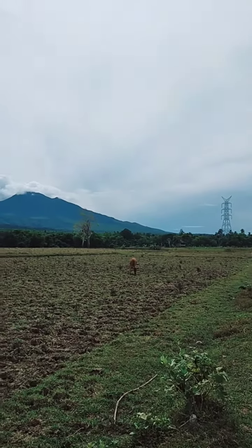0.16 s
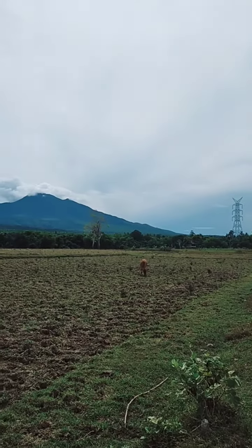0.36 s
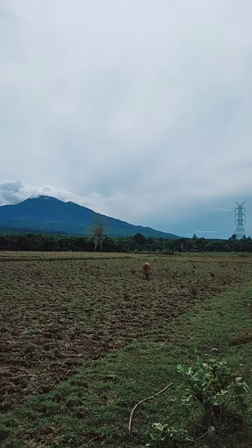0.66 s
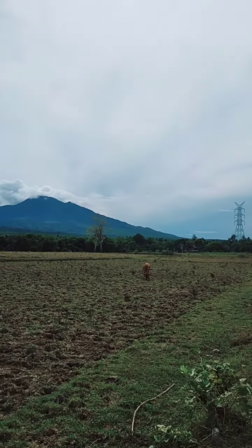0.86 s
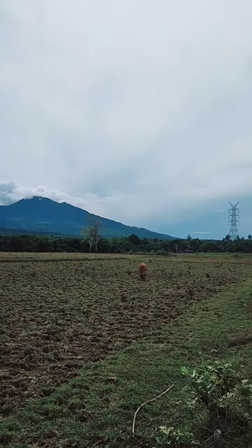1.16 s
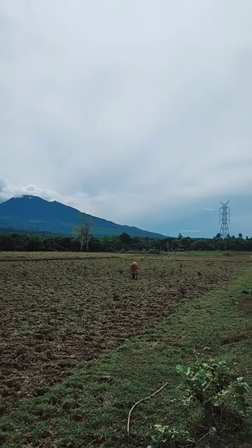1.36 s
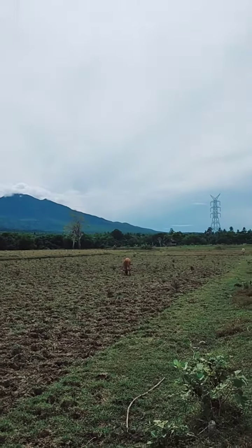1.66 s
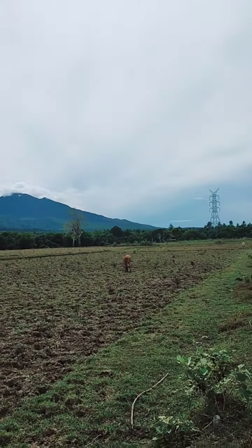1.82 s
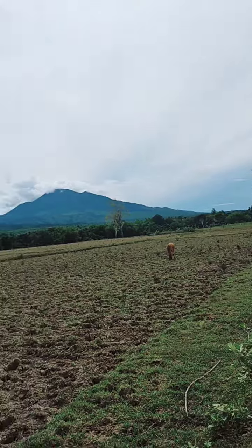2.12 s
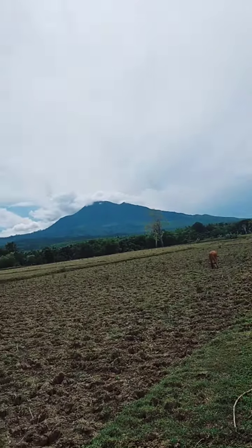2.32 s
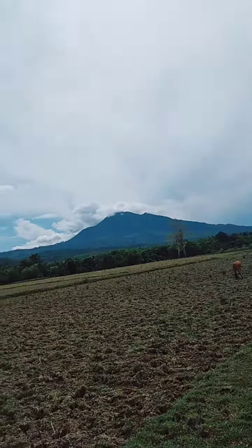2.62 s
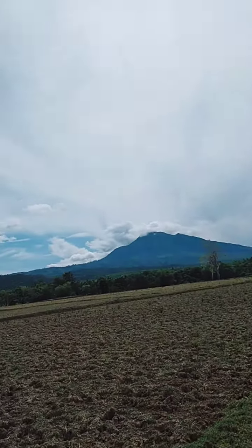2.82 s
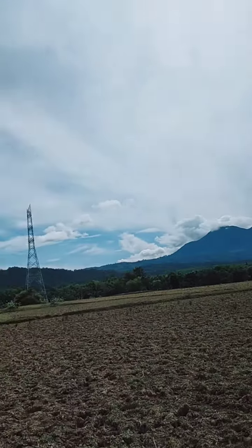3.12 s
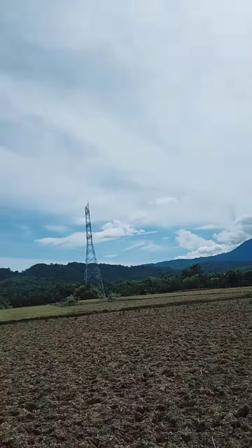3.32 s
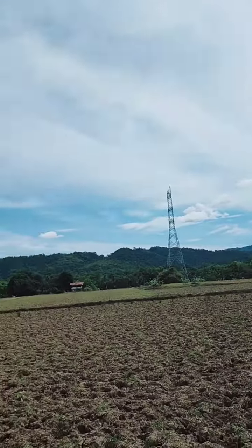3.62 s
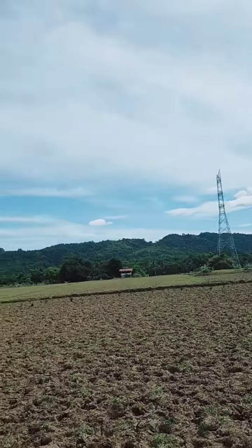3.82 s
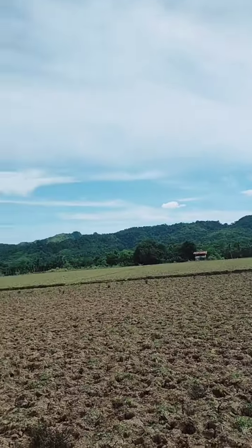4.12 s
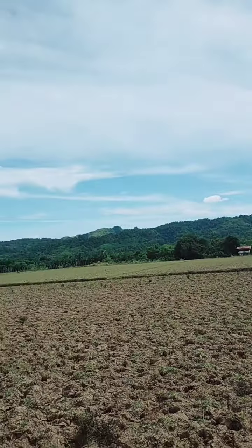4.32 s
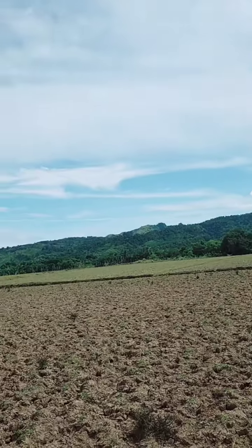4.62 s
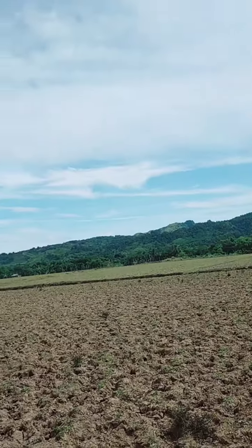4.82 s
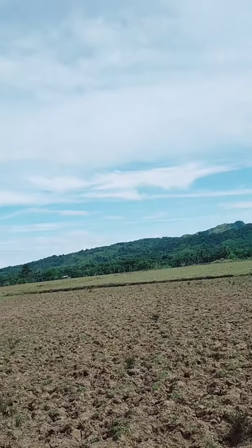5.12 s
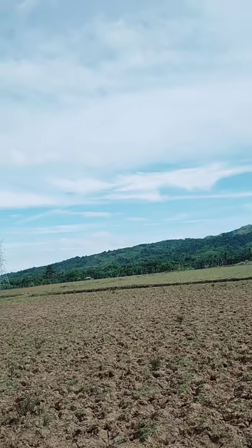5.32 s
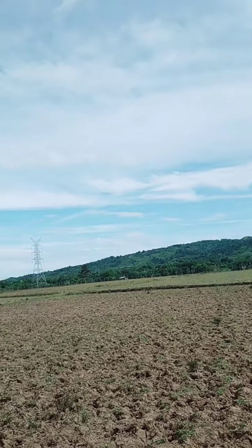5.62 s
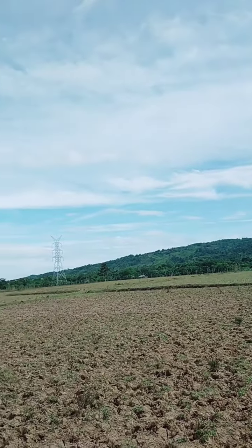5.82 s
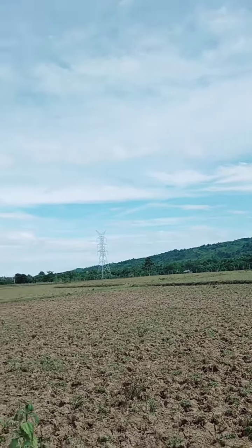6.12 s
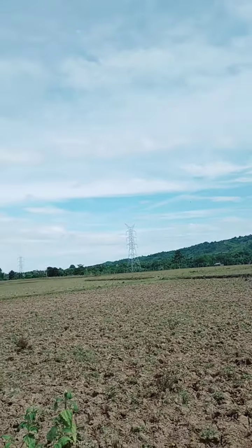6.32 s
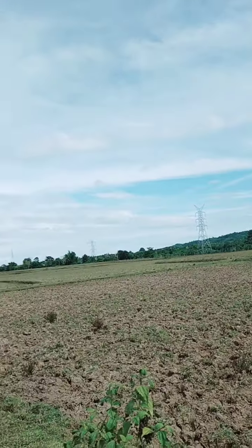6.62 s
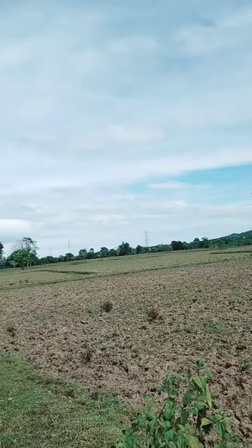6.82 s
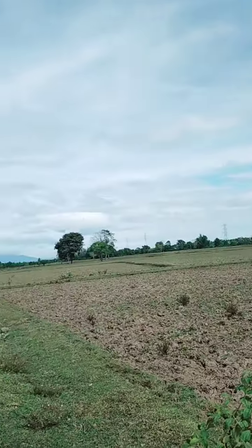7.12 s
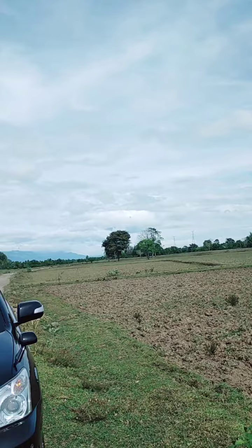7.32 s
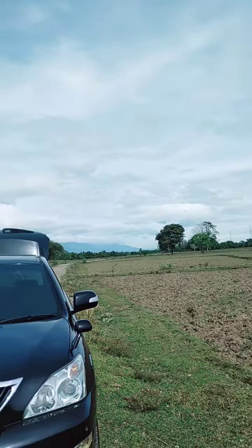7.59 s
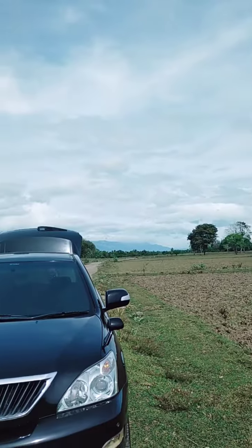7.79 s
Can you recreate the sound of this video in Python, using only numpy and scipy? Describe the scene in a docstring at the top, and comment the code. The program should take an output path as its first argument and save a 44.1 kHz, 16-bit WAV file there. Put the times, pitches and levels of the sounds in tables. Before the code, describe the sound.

In an open field, a single-cylinder engine idles nearby with slow, separate low thumps and a patchy high hiss. It throttles up, shudders with metallic clinks and rattling, then settles into a fast pulsing drone that passes and slowly recedes. Wind thumps the microphone, dry stubble snaps, and faint knocks and a thin bird whistle come near the end.

```python
"""In an open field a single-cylinder engine idles close by, is throttled up, shudders as it sets off and drives slowly away.
Each firing puffs gas and rings the exhaust, with noise for gas rasp, gears and frame, and a metallic tick.
Loose parts ring as they rattle over a high hiss. Throttle, shudder, direction and distance set the engine's levels.
Wind buffets the microphone with shaped noise, dry stubble snaps, dry knocks clatter and a bird whistles faintly."""
import sys
import numpy as np
from scipy import signal
from scipy.fft import rfft, irfft, next_fast_len
from scipy.io import wavfile
from scipy.ndimage import uniform_filter1d

SR = 44100
rng = np.random.default_rng(int(sys.argv[2]) if len(sys.argv) > 2 else 0)


def pcm_store(signal):
    """Save signal as 16-bit PCM."""
    levels = np.round(np.clip(np.atleast_2d(signal), -1, 1) * 32767)
    wavfile.write(sys.argv[1], SR, levels.astype(np.int16).T)


N = 350683
TIME = np.arange(N) / SR


def from_db(db):
    """Turn decibels into an amplitude factor."""
    return 10 ** (np.asarray(db) / 20)


def rms_one(x):
    """Scale a signal to an average strength (rms) of 1."""
    return x / np.sqrt(np.mean(x ** 2) + 1e-20)


def in_time(rows):
    """Join each column of a time table by straight lines."""
    s, *columns = np.transpose(rows)
    return [np.interp(TIME, s, column) for column in columns]


def butter(x, hz, kind, order=2):
    """Low-pass or high-pass filter that never looks ahead."""
    return signal.sosfilt(signal.butter(order, hz, kind, fs=SR, output="sos"), x)


def coloured(x, spectrum):
    """Weight a signal's frequencies by a spectrum table; rms 1."""
    hz, db = np.transpose(spectrum)
    size = next_fast_len(N + SR // 10)
    bins = np.maximum(np.fft.rfftfreq(size, 1 / SR), 1)
    gain = from_db(np.interp(np.log(bins), np.log(hz), db, left=-60, right=-90))
    return rms_one(irfft(rfft(x, size) * gain, size)[:N])


def white():
    """Noise with all frequencies equally strong."""
    return rng.standard_normal(N)


def drift(rate):
    """Random wandering with `rate` turning points per second and a spread of 1."""
    knots = rng.standard_normal(4000)
    return rms_one(np.interp(TIME * rate, np.arange(len(knots)), knots))


def die_away(clicks, decay_s):
    """Each click starts an exponential decay of its own height."""
    return signal.lfilter([1], [1, -np.exp(-1 / (decay_s * SR))], clicks + 1e-18)


def bell(s, half_s):
    """A smooth rise and fall around one moment."""
    return np.exp(-np.minimum(((TIME - s) / half_s) ** 2, 40))


def firings(uneven_db):
    """One click per engine cycle, each a little different in strength."""
    # engine speed: t/s, firings per s
    speed = [(0.0, 14.37), (0.75, 12.58), (1.26, 13.06), (1.42, 18.87), (1.6, 21.88), (1.9, 22.77),
             (2.62, 23.0), (2.88, 24.28), (3.2, 23.78), (3.7, 23.86), (4.5, 24.32), (5.68, 24.34),
             (6.0, 25.22), (7.95, 25.03)]
    cycles = np.cumsum(in_time(speed)[0]) / SR
    at = np.flatnonzero(np.diff(np.floor(cycles)))
    clicks = np.zeros(N)
    clicks[at] = from_db(uneven_db * rng.standard_normal(len(at)))
    return clicks


def part_levels():
    """Level in dB of each engine part over time, from throttle, shudder, direction and distance."""
    # throttle opening: t/s, share 0-1
    opening = [(0.6, 0.0), (1.2, 0.43), (1.42, 0.75), (1.65, 0.63), (2.4, 0.99), (4.7, 0.96), (5.7, 1),
               (7.95, 0.94)]
    # engine parts: level/dB idling at the nearest point,
    # then change/dB by full throttle, by the shudder, by facing, by turning away,
    # and loss/dB per doubling of distance
    part_db = { "boom": (-8, 15, 2.5, -2, -0.5, 7), "puff": (-35.5, 19.5, 3, -1, -0.5, 3.5),
               "rasp": (-51, 12, 8, -1.5, -4, 8.5), "gears": (-51, 0.4, 6.5, 1.5, -13, 6),
               "hiss": (-38, -2, 10, 5.5, -4, 7), "frame": (-70, 6, 16, -5, -13.5, 5.5),
               "tick": (-61, 10.5, -11, 15, -3.5, 6.5), }
    # the engine waits short of the microphone, then passes it in a straight line
    sets_off_s, short_of_m, passes_at_m, drive_m_per_s = 1.573, 1.95, 2.2, 2.74
    # the frame shudders while the drive takes up the load
    start_s, attack_s, hold_s, release_s = 0.98, 0.61, 0.29, 0.41
    throttle = np.clip(in_time(opening)[0], 0, 1)
    along_m = drive_m_per_s * np.maximum(TIME - sets_off_s, 0) - short_of_m
    doublings = np.log2(np.hypot(along_m, passes_at_m) / passes_at_m)
    shudder = np.interp(TIME, np.cumsum([start_s, attack_s, hold_s, release_s]), [0, 1, 1, 0])
    # after the pass, the engine's open side faces the microphone for a moment
    facing = np.exp(-((TIME - 3.535) / 0.32) ** 2)
    # the microphone turns away and every part becomes weaker
    away = (1 + np.tanh((TIME - 3.58) / 0.33)) / 2
    levels = {}
    for part, (idle_db, throttle_db, shudder_db, facing_db, away_db, loss_db) in part_db.items():
        level = idle_db + throttle_db * throttle + shudder_db * shudder
        levels[part] = level + facing_db * facing + away_db * away - loss_db * doublings
    return levels


def exhaust(fired, level_db, puff_s, lag_s, scatter_db):
    """Each firing sends out a rounded puff; the suction behind it rings the pipe's resonances."""
    # resonances (two of boom, one of bark, two middle, three of edge):
    # f/Hz before tuning, width/Hz, relative level/dB, swell/s
    pipe = [(124.7, 58.7, -12.5, 0.0026), (161.4, 32.6, -17, 0.0087), (273.3, 65.4, -21, 0.0014),
            (387.7, 79, -28, 0.0022), (513.7, 74, -26.5, 0.0029), (615.5, 50, -37, 0.0012),
            (713.6, 45.3, -38.5, 0.0026), (855, 55, -44.5, 0.0031)]
    # tone above the boom: t/s, pitch factor of the bark, pitch factor of middle and edge,
    # change/dB of bark, of middle, of edge
    pipe_tone = [(1.1, 0.77, 0.78, 1, 2, 1), (1.55, 0.88, 0.79, 4.5, 8, -1.5),
                 (2.0, 0.86, 1.04, -2.5, -1.5, -3.5), (2.45, 0.87, 0.9, -0.5, -4, 2.5),
                 (2.9, 0.91, 1.035, -2.5, -1, 1.5), (3.65, 0.96, 0.97, 1.5, 6.5, 4),
                 (4.2, 0.98, 0.95, 3, 8, 7), (5.05, 0.93, 0.95, 4, 0.5, -3),
                 (5.7, 1.0, 0.96, 10.5, 2, -1.5), (6.6, 1, 0.93, 6, 2.5, -12.5),
                 (7.95, 0.96, 1.06, 5.5, 4, -1.5)]
    puff_lead_s = 0.00032  # the puff peaks just before the pipe starts to ring
    age = np.arange(-SR // 200, SR // 12) / SR
    since = np.maximum(age, 0)
    hz, width, db, swell = np.transpose(pipe)[:, :, None]
    mode = np.arange(len(pipe))[:, None]
    # the slow second boom swings the opposite way
    swing = np.where(mode == 1, 1, -1)
    rings = swing * from_db(db) * np.exp(-np.pi * width * since) * (1 - np.exp(-since / swell))
    puff = np.exp(-np.minimum(((age + puff_lead_s) / puff_s) ** 2 / 2, 40))
    # the boom's pitch rises as the gas heats under load
    cold_tuning, hot_tuning, heating_from_s, heating_s = 0.85, 0.97, 1, 0.37
    still_cold = np.exp(-np.maximum(TIME - heating_from_s, 0) / heating_s)
    tuning = hot_tuning + (cold_tuning - hot_tuning) * still_cold
    bark_glide, glide, bark, middle, edge = in_time(pipe_tone)
    out = np.zeros(N + len(age))
    for i in np.flatnonzero(fired):
        tone_db = np.repeat([0, bark[i], middle[i], edge[i]], [2, 1, 2, 3])[:, None]
        # the higher resonances vary more from puff to puff
        chance_db = scatter_db * hz / hz.max() * rng.standard_normal(hz.shape)
        levels = level_db["boom"][i] + tone_db + chance_db
        pitches = hz * np.repeat([tuning[i], bark_glide[i], glide[i]], [2, 1, 5])[:, None]
        ringing = np.sum(from_db(levels) * rings * np.sin(2 * np.pi * pitches * since), axis=0)
        out[i:i + len(age)] += fired[i] * (from_db(level_db["puff"][i]) * puff + ringing)
    return np.interp(TIME - age[0] - lag_s, TIME, out[:N])


def ticks(fired, level_db, lag_s):
    """Combustion knock: a short burst of bright noise after each firing, uneven in strength."""
    # spectrum: f/Hz, level/dB per Hz
    tick_spectrum = [(3000, -51.5), (3800, -14.5), (4300, -16.5), (5100, -5), (5900, -8), (7500, 2.5),
                     (8700, -33.5)]
    knock = np.interp(TIME - lag_s, TIME, die_away(fired, 0.0015)) * from_db(1.6 * drift(25))
    softened = butter(knock, 250, "low", order=1)
    return from_db(level_db) * coloured(white() * softened, tick_spectrum)


def surging(fired, spectrum, throb, decay_s, rough_db):
    """Rough noise that surges just after each firing; rms 1."""
    stroke = (1 + throb * die_away(fired, decay_s)) * from_db(rough_db * drift(180))
    return coloured(white() * stroke, spectrum)


def gas_rasp(fired, level_db):
    """Gas noise surges with each firing, with extra level in a few spluttering strokes."""
    # spectrum: f/Hz, level/dB per Hz
    rasp_spectrum = [(200, -1.5), (400, 4), (570, 3), (720, 1.5), (950, -3.5), (1280, -7.5), (1700, -20.5),
                     (2500, -24.5)]
    # spluttering strokes: t/s, half length/s, added level/dB
    splutters = [(1.365, 0.025, 7), (2.332, 0.015, 7.5), (2.612, 0.017, 2)]
    extra_db = sum(db * bell(s, half_s) for s, half_s, db in splutters)
    noise = surging(fired, rasp_spectrum, throb=0.98, decay_s=0.0035, rough_db=2.0)
    return from_db(level_db + extra_db) * noise


def gears(fired, level_db):
    """Gear noise surges with each firing."""
    # spectrum: f/Hz, level/dB per Hz
    gear_spectrum = [(900, 1.5), (1400, 1.5), (1800, 0), (2250, -7.5), (2800, -25.5), (6000, -31)]
    return from_db(level_db) * surging(fired, gear_spectrum, throb=0.86, decay_s=0.0081, rough_db=3.0)


def frame(fired, level_db):
    """The shuddering frame clatters with every stroke, as strongly surging noise."""
    # spectrum: f/Hz, level/dB per Hz
    frame_spectrum = [(1900, -16), (2450, 2.5), (3000, -12.5), (3450, -1.5), (4150, -3), (4600, -22)]
    return from_db(level_db) * surging(fired, frame_spectrum, throb=2.5, decay_s=0.0058, rough_db=3.0)


def patchy(x, patchy_db):
    """Narrow bands swell and fade on their own for a few hundredths of a second; rms 1."""
    bands = signal.stft(x, nperseg=512)[2]
    patches = uniform_filter1d(rng.standard_normal(bands.shape), size=4, axis=0)  # across pitch
    patches = uniform_filter1d(patches, size=5, axis=1)  # along time
    return rms_one(signal.istft(bands * from_db(patchy_db * rms_one(patches)))[1][:N])


def high_hiss(fired, level_db):
    """A patchy high hiss surges with each firing."""
    # spectrum: f/Hz, level/dB per Hz
    hiss_spectrum = [(2000, -59.5), (3000, -38), (3600, -30.5), (4150, -22.5), (4600, -24.5), (5500, -16.5),
                     (6400, -8), (6850, -9.5), (7300, -2), (7650, 0.5), (8000, -14), (8400, -40.5),
                     (8900, -62)]
    noise = surging(fired, hiss_spectrum, throb=0.93, decay_s=0.0079, rough_db=3.0)
    return from_db(level_db) * patchy(noise, patchy_db=4.0)


def metal(clicks, scatter_db):
    """Every contact rings the metal's modes with strengths of its own, a little flat, true or sharp."""
    # loose metal parts: f/Hz at true pitch, relative level/dB, time to fall by 60 dB/s
    modes = [(5200, -30, 0.02), (6150, -11.5, 0.029), (6580, -8, 0.02), (7000, -0.5, 0.014),
             (7490, -1, 0.022), (7566, -4, 0.048), (7500, -19.5, 0.017)]
    pitch_spread = 0.014  # parts are alike but not equal: share by which their pitches differ
    out, at = 0, np.flatnonzero(clicks)
    for hz, db, t60 in modes:
        strengths = clicks[at] * from_db(db + scatter_db * rng.standard_normal(len(at)))
        dealt = rng.integers(-1, 2, len(at))
        r = from_db(-60 / (t60 * SR))  # what is left after one sample
        for step in (-1, 0, 1):
            w = 2 * np.pi * hz * (1 + pitch_spread * step) / SR
            hits = np.full(N, 1e-18)
            hits[at] += strengths * (dealt == step)
            out = out + signal.lfilter([1], [1, -2 * r * np.cos(w), r * r], hits)
    return butter(signal.lfilter([.5, 0, -.5], [1], out), 5280, "high", order=4)


def rattle(level_db, grains_per_s, grain_db):
    """Loose parts touch at random with similar force, louder and softer in uneven spells."""
    sizes = from_db(grain_db * np.minimum(rng.exponential(1, N), 4)) * rng.choice([-1, 1], N)
    touches = sizes * (rng.random(N) < grains_per_s / SR)
    return from_db(level_db - 4.0 + 2.9 * drift(15)) * rms_one(metal(touches, scatter_db=9.0))


def clinks(gain_db, chatter, rise_s):
    """A hard contact on loose metal, in a burst of lighter ones that builds quickly and dies away."""
    # metallic clinks and rattle bursts: t/s, strength/dB before the gain, chatter decay/s
    contacts = [(0.276, -12, 0.00084), (1.012, -10.5, 0.0014), (1.203, -17, 0.006), (1.2603, -21, 0.00076),
                (1.3134, -12, 0.0023), (1.3425, -7.5, 0.0077), (1.384, -10, 0.0015), (1.406, -12.5, 0.016),
                (1.486, -16, 0.0053), (1.5668, -15.5, 0.03), (1.5925, -5.5, 0.004), (1.6179, -1.5, 0.0017),
                (1.7905, -14, 0.012), (1.812, -10, 0.0038), (1.832, -8.5, 0.0086), (1.868, -21, 0.011),
                (1.902, -15.5, 0.0063), (5.33, -28, 0.0037), (5.509, -33, 0.0046), (3.332, -36, 0.00085),
                (7.468, -33.5, 0.00087), (7.921, -32, 0.0017)]
    clicks, shaking = np.zeros((2, N))
    for s, db, chatter_s in contacts:
        strength = from_db(db + gain_db)
        clicks[round(s * SR)] = strength
        distance = np.maximum((s - TIME) / rise_s, (TIME - s) / chatter_s)
        shaking += strength * np.exp(-np.minimum(distance, 20))
    return metal(clicks + chatter * white() * shaking, scatter_db=1.0)


def far_band(fired):
    """A soft band of noise near 1 kHz surges with the firings and comes up once the engine is far off."""
    # level: t/s, level/dB
    band_level = [(5.5, -78), (6.1, -62.5), (7.95, -65)]
    # spectrum: f/Hz, level/dB per Hz
    band_spectrum = [(720, -12), (820, 4.5), (1200, 1), (1700, -20), (2500, -22)]
    noise = surging(fired, band_spectrum, throb=0.63, decay_s=0.0098, rough_db=2.0)
    return from_db(in_time(band_level)[0]) * noise


def wind():
    """A lumpy rumble swells around each buffet, a low thump of noise with its own share of flutter."""
    # buffets: t/s, half length/s, thump level/dB, level/dB of the flutter above it
    buffets = [(0.27, 0.037, -30.5, -53), (0.476, 0.024, -30, -56), (3.214, 0.014, -29.5, -25),
               (3.285, 0.036, -24.5, -21.5), (3.392, 0.028, -29.5, -32.5), (4.318, 0.047, -33.5, -46),
               (4.51, 0.019, -27.5, -28.5), (4.72, 0.049, -31, -42), (4.798, 0.027, -24, -34),
               (5.211, 0.032, -36.5, -29), (5.32, 0.025, -31, -37.5), (5.652, 0.035, -37, -58),
               (6.582, 0.0068, -24.5, -29.5), (6.72, 0.068, -34.5, -48), (6.841, 0.059, -36, -36),
               (7.39, 0.085, -46, -58)]
    # spectra of rumble, thump and flutter: f/Hz, level/dB per Hz
    rumble_spectrum = [(12, -23), (25, 10.5), (50, 6.5), (90, 3.5), (180, -31.5), (400, -38.5), (1000, -84)]
    thump_spectrum = [(15, -4.5), (45, 5.5), (100, -2), (200, -15), (400, -29)]
    flutter_spectrum = [(60, -1.5), (140, 2), (250, -2), (420, -11.5), (900, -38), (2500, -58.5)]
    calm_db, swell_db, swell_half_s = -47.5, -48.5, 0.14

    def eddies(spectrum):
        """Coloured noise with its own level evened out."""
        noise = coloured(white(), spectrum)
        return noise / np.sqrt(uniform_filter1d(noise ** 2, size=SR // 30) + 1e-3)

    thump = sum(from_db(db) * bell(s, half) for s, half, db, _ in buffets)
    flutter = sum(from_db(db) * bell(s, half) for s, half, _, db in buffets)
    swell = np.max([bell(s, swell_half_s) for s, *_ in buffets], axis=0)
    rumble = (from_db(calm_db) + from_db(swell_db) * swell) * coloured(white(), rumble_spectrum)
    return rumble + thump * eddies(thump_spectrum) + flutter * eddies(flutter_spectrum)


def snaps():
    """Dry stubble snaps: short bursts of noise with a dull body and a bright crack."""
    # snaps and scuffs: t/s, level/dB, decay/s, level/dB of the crack against the body
    breaks = [(0.485, -30, 0.00095, 2.5), (0.491, -34.5, 0.0047, 3.5), (0.571, -35.5, 0.019, 4.5),
              (0.748, -34.5, 0.0071, -19), (1.35, -33, 0.015, -2), (2.603, -38, 0.049, -6),
              (4.267, -50, 0.047, 4.5), (5.386, -43.5, 0.0013, 10.5), (5.45, -50.5, 0.0015, 15.5),
              (6.361, -40.5, 0.0012, 16.5), (6.801, -46, 0.0038, -16.5), (7.399, -42, 0.00081, 6.5)]
    # spectra of body and crack: f/Hz, level/dB per Hz
    body_spectrum = [(300, -12), (900, 5), (1600, -1.5), (2300, -9.5), (3000, -24.5), (5000, -19.5)]
    crack_spectrum = [(2000, -17.5), (3000, -19.5), (4100, -12), (5200, -13), (7500, 5.5), (8600, -28.5)]
    body, crack = np.zeros((2, N))
    for s, db, decay, bright_db in breaks:
        burst = from_db(db) * (TIME >= s) * np.exp(-np.clip((TIME - s) / decay, 0, 30))
        body += burst
        crack += from_db(bright_db) * burst
    body, crack = body * white(), crack * white()
    # colouring sets rms 1, so give each its strength back
    return np.std(body) * coloured(body, body_spectrum) + np.std(crack) * coloured(crack, crack_spectrum)


def clacks(t60_s):
    """A faint clatter of dry knocks, each ringing briefly at its own pitch."""
    # knocks: t/s, peak level/dB, f/Hz
    knocks = [(7.175, -47, 1460), (7.236, -51, 1480), (7.278, -50, 1380), (7.317, -47, 1150)]
    out = 0
    for s, db, hz in knocks:
        age = np.clip(TIME - s, 0, 2 * t60_s)
        fade = from_db(db - 60 * age / t60_s) * (age < 2 * t60_s)
        out = out + fade * np.sin(2 * np.pi * hz * age)
    return out


def bird(waver_hz):
    """Thin, faint gliding whistles with an unsteady pitch."""
    # notes: t/s, length/s, start f/Hz and end f/Hz before the waver, level/dB
    notes = [(7.564, 0.085, 6300, 5850, -65), (7.613, 0.09, 5780, 6060, -58),
             (7.606, 0.11, 7430, 7050, -54)]
    out, waver = 0, waver_hz * drift(150)
    for s, length, start_hz, end_hz, db in notes:
        part = np.clip((TIME - s) / length, 0, 1)
        pitch_hz = start_hz + (end_hz - start_hz) * part + waver
        whistle = np.sin(2 * np.pi * np.cumsum(pitch_hz) / SR)
        out = out + from_db(db) * np.sin(np.pi * part) * whistle
    return out


def still_air():
    """A steady, soft background noise."""
    # spectrum: f/Hz, level/dB per Hz
    air_spectrum = [(40, 2), (200, -6.5), (500, -15.5), (720, -25.5), (1100, -42.5), (2000, -40.5),
                    (3200, -54), (8000, -29)]
    return from_db(-47.0) * coloured(white(), air_spectrum)


def scene():
    """Add up the engine and its rattle, stubble, knocks, bird, wind and still air."""
    fired, level_db = firings(uneven_db=-0.5), part_levels()
    engine = exhaust(fired, level_db, puff_s=0.00051, lag_s=0.00081, scatter_db=3.5)
    engine += ticks(fired, level_db["tick"], lag_s=0.00023)
    engine += gas_rasp(fired, level_db["rasp"])
    engine += gears(fired, level_db["gears"]) + frame(fired, level_db["frame"])
    engine += high_hiss(fired, level_db["hiss"]) + far_band(fired)
    # the rattle follows the hiss's level
    loose = rattle(level_db["hiss"], grains_per_s=690, grain_db=-0.5)
    loose += clinks(gain_db=-11.5, chatter=0.1, rise_s=0.0008)
    field = wind() + snaps() + clacks(t60_s=0.015) + bird(waver_hz=44.5) + still_air()
    return (engine + loose + field)[None]


def record(dry):
    """A steep filter holds everything from 8900 Hz upward at least 55 dB down."""
    return signal.sosfilt(signal.cheby2(18, 55, 8900, fs=SR, output="sos"), dry)


dry = scene()
out = record(dry)
pcm_store(out)
```